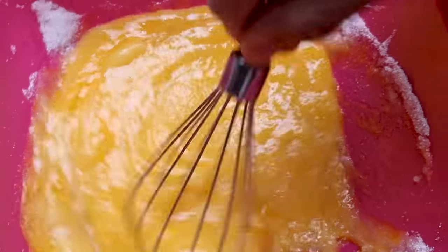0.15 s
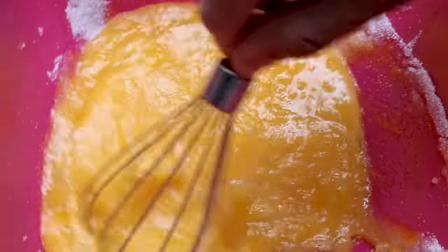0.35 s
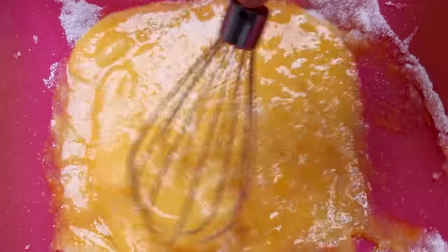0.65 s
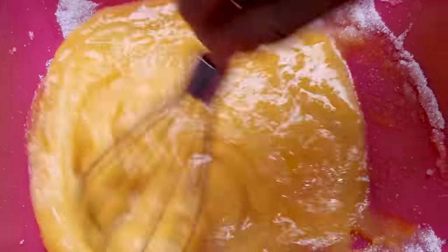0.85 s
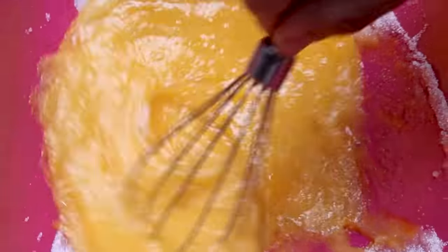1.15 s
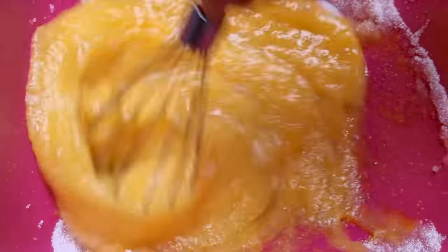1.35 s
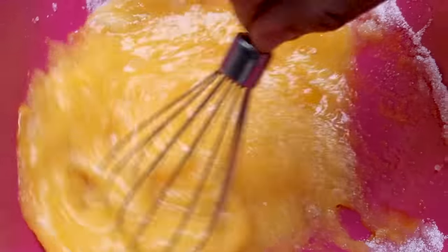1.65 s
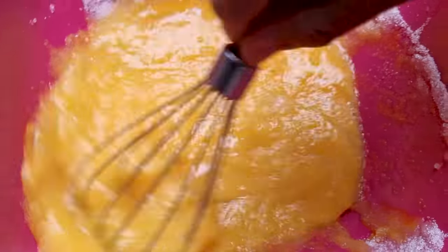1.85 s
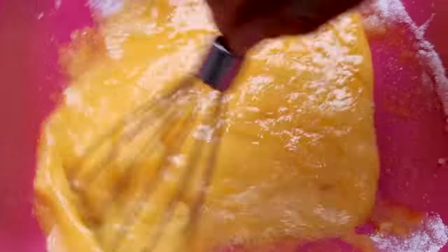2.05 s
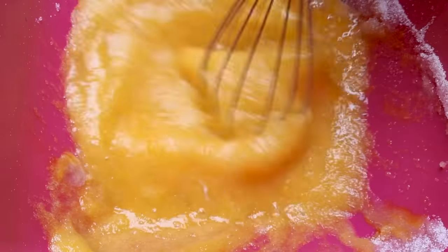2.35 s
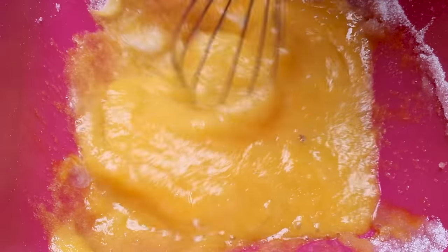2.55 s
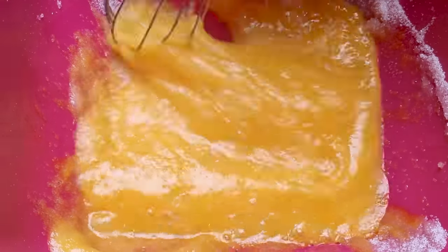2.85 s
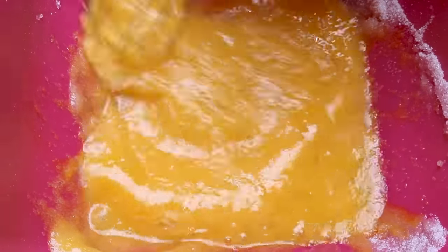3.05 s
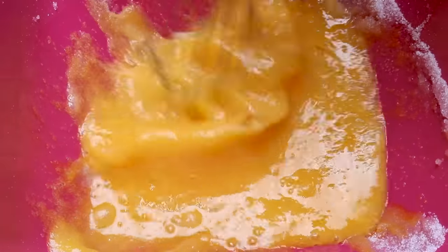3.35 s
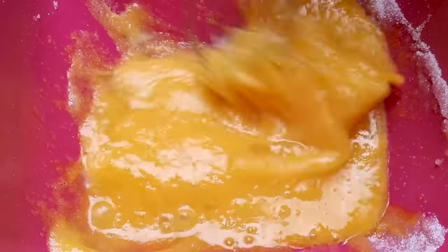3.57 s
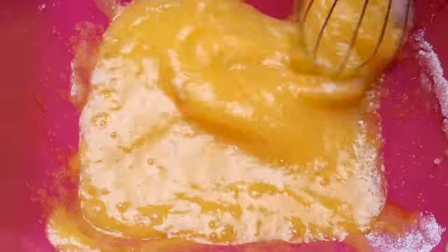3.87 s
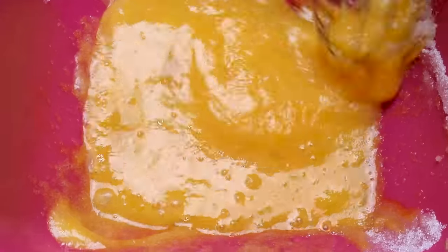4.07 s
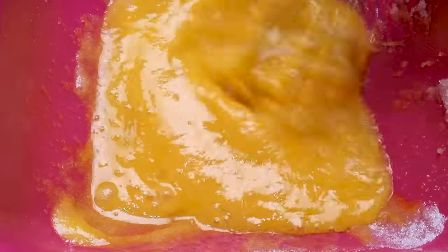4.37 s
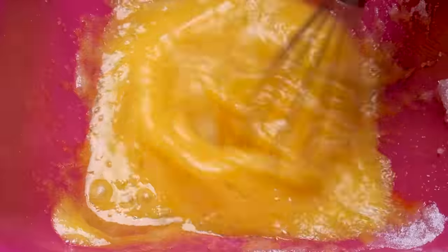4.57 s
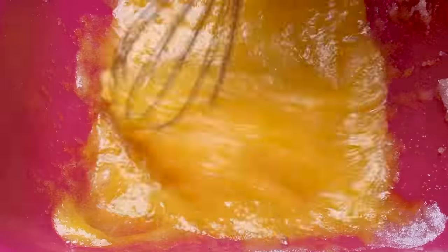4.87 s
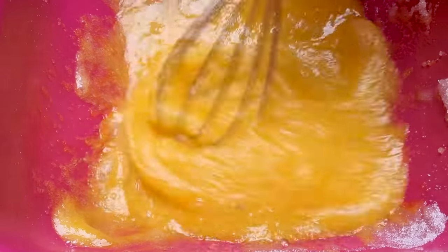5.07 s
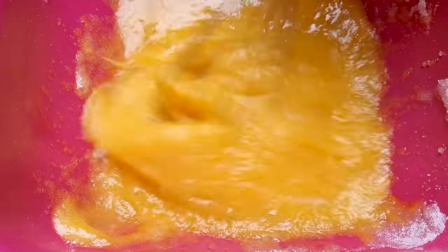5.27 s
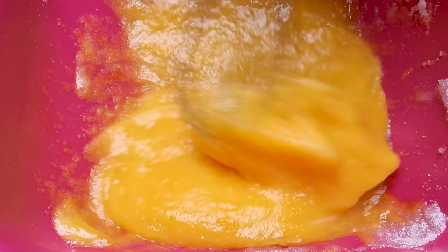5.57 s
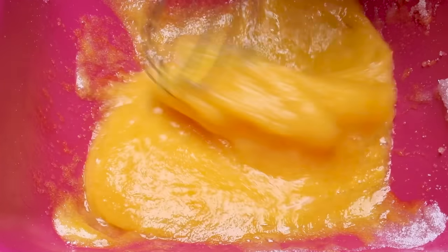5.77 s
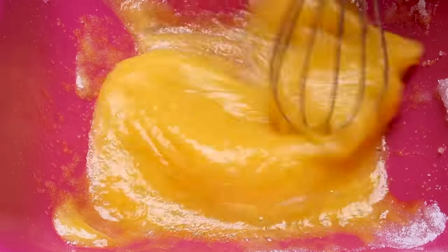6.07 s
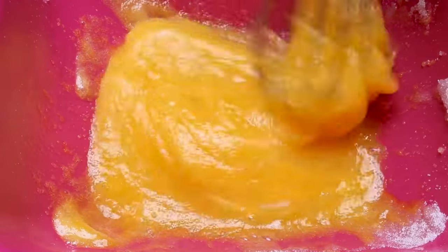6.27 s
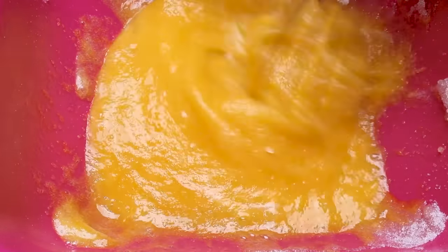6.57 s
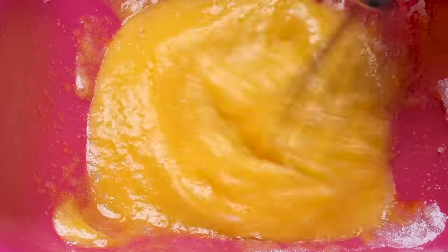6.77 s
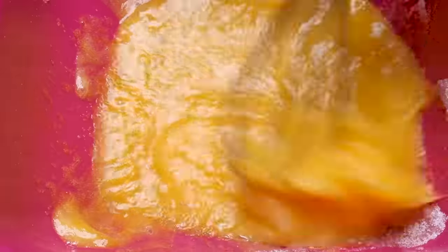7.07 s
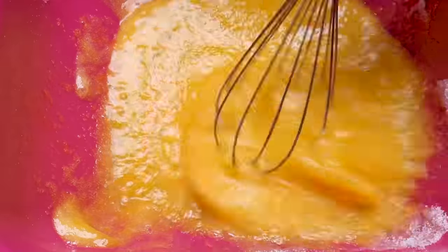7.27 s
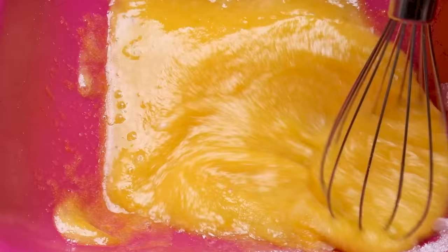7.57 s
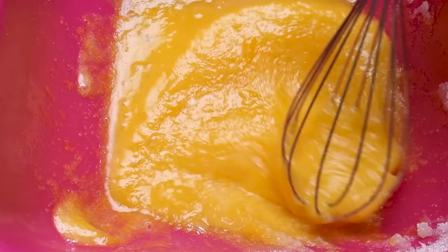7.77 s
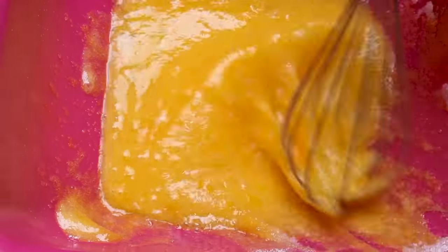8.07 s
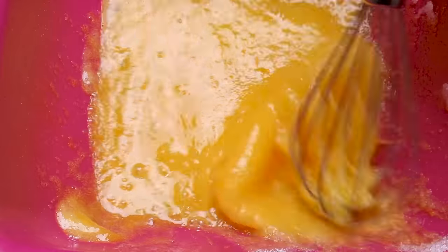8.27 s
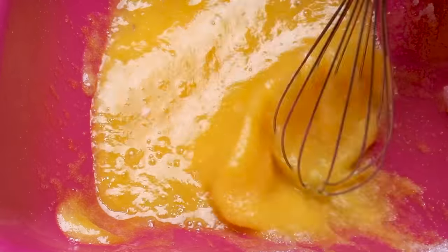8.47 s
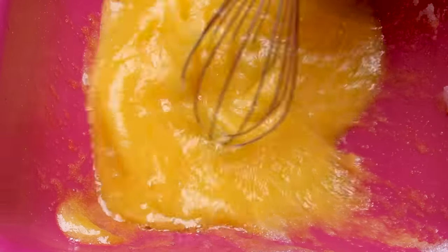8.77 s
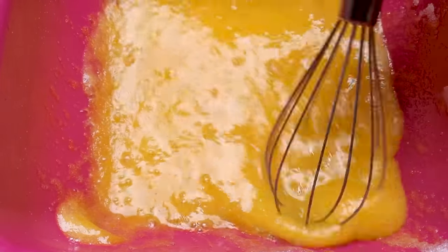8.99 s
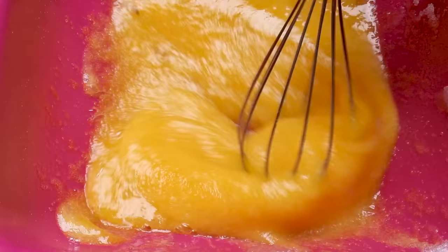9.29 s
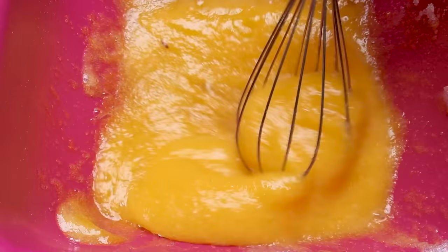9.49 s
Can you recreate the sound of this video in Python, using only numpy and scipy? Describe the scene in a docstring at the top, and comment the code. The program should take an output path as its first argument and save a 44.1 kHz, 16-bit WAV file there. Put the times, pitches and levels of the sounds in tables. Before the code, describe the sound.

A wire whisk rapidly beats thick batter in a plastic bowl, with hollow knocks, short scrapes, wire clicks and faint wet crackling.

```python
"""Whisking batter in a plastic bowl

A wire whisk beats thick egg batter close to two microphones in a kitchen. Each impact excites the
damped modes of the bowl and rattles the wires; stick-slip friction along the wall hisses and drives
the same modes. Bubbles burst in the sugary batter, and the room reverberates briefly over the hum
of an appliance."""
import sys
import numpy as np
from scipy import signal
from scipy.fft import rfft, irfft, next_fast_len
from scipy.io import wavfile
from scipy.ndimage import uniform_filter1d

SR = 44100
rng = np.random.default_rng(int(sys.argv[2]) if len(sys.argv) > 2 else 0)


def log_audio(samples):
    """Write samples as a 16-bit WAV file to the path given in sys.argv[1]."""
    # one column per channel
    frames = np.atleast_2d(samples).T
    # limit to full scale, then quantise
    limited = np.clip(frames, -1, 1)
    pcm = np.round(limited * 32767).astype(np.int16)
    wavfile.write(sys.argv[1], SR, pcm)


N = 424683

# room and microphone noise: (frequency [Hz], relative density [dB])
NOISE_SPECTRUM = [(12, -31.5), (20, -6.5), (110, -2.5), (150, -19), (222, 1), (337, -6), (399, -8.5),
                  (527, -10), (1570, -26), (4060, -51.5), (4940, -42), (9140, -49.5), (16000, -40)]
# likeness of that noise at the two microphones: (frequency [Hz], correlation [0-1])
NOISE_CORRELATION = [(60, 0.96), (300, 0.96), (1000, 0.74), (3000, .1)]
# appliance hum: (frequency [Hz], level [dB], rms frequency deviation [Hz])
HUM_LINES = [(95, -58, 2.1), (142, -58.5, 11.66), (206.4, -66.5, 15)]
# reverberation time: (frequency [Hz], t60 [s])
ROOM_DECAY = [(200, 0.65), (600, 0.28), (1500, 0.2), (4000, 0.26), (10000, 0.19)]
# bubbling of the batter: (time [s], fizz level [dB], wet crackle level [dB])
BUBBLE_LEVELS = [(0.0, -71, -67), (0.32, -53.5, -67), (0.56, -49, -77), (0.8, -48.5, -63), (1.1, -60, -70),
                 (1.3, -51, -62), (1.9, -72, -55), (2.15, -53, -77), (2.841, -61.5, -62), (4.0, -54.5, -59),
                 (4.24, -51.5, -61), (4.75, -57.5, -59), (6.699, -52.5, -58.5), (7.11, -63, -64.5),
                 (7.4, -52, -52), (7.6, -55.5, -58.5), (8.34, -67, -70), (8.64, -53.5, -74),
                 (8.95, -58, -92), (9.1, -69, -64), (9.63, -56, -57.5)]
# fizz, wet crackle and friction hiss: (frequency [Hz], filter gain [dB])
FIZZ_SPECTRUM = [(2470, -68), (4200, -32), (5110, -7), (5530, -14.5), (6830, -12), (14800, -10.5),
                 (16000, -4.5)]
WET_SPECTRUM = [(900, -3.5), (1500, -9.5), (4000, -13.5), (7000, -11.5), (16000, -31.5)]
HISS_SPECTRUM = [(880, -10.5), (1500, 5), (1790, -14.5), (3310, -12.5), (3690, -8), (4080, -9),
                 (7610, -8.5), (9190, -10.5), (15100, -11.5), (16000, -6.5)]
# wires striking each other: (time [s], relative level [dB], frequency [Hz])
WIRE_CLICKS = [(0.246, -32, 4140), (1.048, -17.5, 8180), (1.534, -27, 4100), (1.732, -29, 5060),
               (1.901, -26, 4730), (1.951, -17, 3380), (1.975, -20.5, 3370), (2.325, -29.5, 11600),
               (2.366, -27.5, 8500), (2.798, -20.5, 7730), (3.5206, -21.5, 7940), (4.0499, -12, 7930),
               (4.438, -25.5, 7650), (5.13, -38, 7700), (5.33, -32.5, 4350), (5.506, -28.5, 3620),
               (5.5212, -10.5, 4170), (5.829, -35, 4900), (6.439, -30, 1870), (5.896, -23, 4270),
               (6.586, -28.5, 4970), (6.8, -36, 5460), (7.011, -38, 9990), (7.35, -21.5, 6600),
               (8.281, -26, 5640), (8.47, -18, 3900), (9.07, -18, 12500), (9.323, -35, 5630)]
# wires sliding on the wall: (time [s], relative hiss [dB], relative ring [dB], contact duration [s])
DRAGS = [(0.0, -37.5, -37, 0.045), (0.035, -51, -22.5, 0.08), (0.19, -52.5, -47, 0.099),
         (0.243, -36.5, -30, 0.047), (0.359, -69, -60, 0.21), (0.528, -76, -61, 0.13),
         (0.701, -44, -42, 0.041), (0.759, -34, -28.5, 0.091), (0.955, -43.5, -42.5, 0.09),
         (1.023, -45, -31.5, 0.088), (1.213, -29, -22.5, 0.039), (1.275, -34.5, -31, 0.053),
         (1.37, -59, -42.5, 0.038), (1.481, -52.5, -59, 0.057), (1.532, -33.5, -27.5, 0.043),
         (1.674, -27.5, -24.5, 0.23), (1.818, -75, -35, 0.012), (1.885, -25.5, -24, 0.3),
         (2.168, -54.5, -65, 0.021), (2.218, -39.5, -30.5, 0.042), (2.319, -58, -54, 0.083),
         (2.393, -34, -25, 0.043), (2.558, -23, -19, 0.095), (2.747, -34, -27, 0.017),
         (2.756, -29, -20, 0.09), (2.93, -26.5, -16, 0.11), (3.116, -26.5, -18.5, 0.12),
         (3.301, -37.5, -35.5, 0.092), (3.508, -24.5, -17.5, 0.097), (3.688, -27.5, -20.5, 0.1),
         (3.855, -27.5, -27, 0.13), (4.032, -25, -17.5, 0.033), (4.08, -23.5, -24, 0.071),
         (4.214, -52, -58, 0.03), (4.256, -41, -38, 0.026), (4.368, -46, -63, 0.018),
         (4.427, -38.5, -33, 0.073), (4.614, -43.5, -43, 0.037), (4.799, -39.5, -32, 0.035),
         (4.928, -49.5, -70, 0.0063), (4.992, -45.5, -54, 0.018), (5.123, -36, -49.5, 0.071),
         (5.324, -40.5, -45.5, 0.07), (5.517, -33.5, -26.5, 0.063), (5.676, -43, -48, 0.086),
         (5.817, -53, -52, 0.1), (5.897, -41, -32, 0.062), (6.042, -32.5, -34.5, 0.077),
         (6.235, -38, -35, 0.012), (6.25, -37.5, -28.5, 0.046), (6.385, -46, -37, 0.012),
         (6.43, -40.5, -35, 0.033), (6.623, -48, -45, 0.087), (6.823, -46, -39, 0.052),
         (6.886, -50.5, -43, 0.027), (6.98, -56, -56, 0.14), (7.07, -36, -30, 0.01),
         (7.232, -25.5, -22, 0.05), (7.344, -49, -52, 0.12), (7.426, -43, -40.5, 0.078),
         (7.793, -27, -23, 0.12), (8.022, -28, -26.5, 0.1), (8.206, -27.5, -19, 0.015),
         (8.245, -28, -26.5, 0.098), (8.448, -30.5, -23.5, 0.06), (8.876, -36.5, -26.5, 0.041),
         (9.063, -43.5, -42, 0.11), (9.23, -49.5, -56, 0.0074), (9.321, -51.5, -43, 0.064),
         (9.509, -48, -45.5, 0.029)]
# modes of the wall, the stiff rim and the base rocking on the counter:
# (frequency [Hz], relative level [dB], unscaled t60 [s])
WALL_MODES = [(481, -9, 0.18), (593, -18.5, 0.1), (665.4, -1, 0.059), (728.4, 4, 0.034), (834, -1, 0.043),
              (920.6, 3, 0.03), (1079, 4.5, 0.033), (1161, 2.5, 0.038), (1280, -5, 0.015),
              (1520, -3, 0.039), (1614, 0, 0.031)]
RIM_MODES = [(1929, 7.5, 0.021), (2226, -4.5, 0.03), (2582, -3, 0.024), (2888, -2.5, 0.031),
             (3120, 0, .015)]
BASE_MODES = [(180.7, -8, 0.12), (265.8, 5, 0.12), (394, 5, 0.1)]
# wires striking the bowl:
# (time [s], relative level [dB], ring centre [Hz], thud [dB re blow], sharpness [dB re blow])
IMPACTS = [(0.035, -3.5, 604, -9.5, -10.5), (0.093, -20, 712, -8.5, -30), (0.189, -12.5, 637, -10, -31),
           (0.273, -22.5, 662, -13.5, -18.5), (0.309, -33, 678, -20, -19.5), (0.363, -25, 654, -6.5, -29.5),
           (0.41, -36, 624, -1.5, -32), (0.532, -20, 763, -8.5, -35.5), (0.617, -30, 649, -8.5, -37.5),
           (0.706, -28.5, 495, -5.5, -1.5), (0.763, -23.5, 680, -32, -5), (0.785, -24, 599, -21.5, -22.5),
           (0.849, -15, 870, -8, -27), (0.959, -23, 743, -13, -6), (1.027, -23, 673, -16.5, -2),
           (1.114, -19, 800, -5.5, -33.5), (1.213, -33, 1070, -39.5, -14), (1.278, -29, 885, -34.5, -5.5),
           (1.375, -16, 604, -6.5, -28.5), (1.542, -28, 652, -26, -29.5), (1.611, -18.5, 710, -5.5, -33.5),
           (1.678, -18.5, 704, -6, -14.5), (1.721, -21.5, 638, -11.5, -30.5), (1.819, -13.5, 776, -8, -31),
           (1.883, -26, 664, -22.5, -8), (1.925, -25, 704, -34.5, -1.5), (2.013, -26, 1500, -9, -1),
           (2.039, -15, 848, -11, -24.5), (2.116, -38, 632, -8.5, -33), (2.223, -14, 767, -26.5, -14.5),
           (2.402, -20.5, 1157, -37, -10), (2.559, -9, 674, -35.5, -4.5), (2.757, -3.5, 1160, -14.5, -9.5),
           (2.932, -7, 1088, -6.5, -8.5), (2.943, -4, 1080, -18, -15.5), (3.114, -25.5, 676, -28, -1.5),
           (3.123, -13.5, 1263, -12.5, -6.5), (3.128, -4, 850, -10, -17), (3.184, -16.5, 800, -13.5, -6.5),
           (3.301, -28.5, 667, -12.5, -7), (3.318, -6.5, 873, -13, -22.5), (3.357, -24.5, 950, -7.5, -1.5),
           (3.508, -3.5, 1133, -26.5, -8), (3.553, -28, 654, -24.5, -8), (3.575, -16.5, 865, -20.5, -8),
           (3.691, -8.5, 670, -22, -1), (3.74, -13, 1185, -21, -15), (3.763, -21.5, 694, -27, -3.5),
           (3.857, -3.5, 728, -29.5, -7.5), (3.906, -18.5, 660, -20, -0.5), (4.034, -7, 700, -22, -5),
           (4.08, -19, 650, -20.5, 0), (4.219, -23, 740, -23, -8), (4.258, -24.5, 762, -25, -1.5),
           (4.285, -33.5, 708, -13, -4.5), (4.431, -16, 678, -25, -11), (4.616, -20, 660, -20, -20.5),
           (4.651, -29, 648, -25.5, -15.5), (4.802, -35, 630, -24, -18.5), (4.827, -34, 730, -8, -6),
           (4.996, -23, 750, -32.5, -16.5), (5.132, -36, 1184, -23, -2), (5.153, -28, 759, -27.5, -0.5),
           (5.171, -20, 760, -29, -14.5), (5.207, -28, 690, -18, -5.5), (5.36, -23.5, 830, -16, -7.5),
           (5.394, -28, 692, -32, -30), (5.52, -15.5, 655, -20, -7.5), (5.573, -22.5, 686, -11.5, -21),
           (5.682, -25.5, 642, -13, -3), (5.714, -18, 940, -24, -9.5), (5.749, -21.5, 676, -21, -13),
           (5.91, -19.5, 759, -16, -2), (6.044, -42, 678, -19.5, -7.5), (6.058, -28, 650, -30, -13),
           (6.074, -6.5, 1267, -28.5, -13), (6.161, -33, 623, -21.5, -7.5), (6.237, -25.5, 622, -27.5, -1),
           (6.254, -16, 991, -20, -19), (6.393, -27.5, 670, -21, 0), (6.434, -22.5, 766, -25, -6.5),
           (6.628, -12, 700, -32, -21.5), (6.658, -27, 656, -16, -5), (6.826, -21, 615, -17, -12),
           (6.897, -29, 676, -17.5, -2), (7.074, -26.5, 700, -8.5, -7), (7.143, -36, 940, -8.5, -8.5),
           (7.232, -29, 676, -21, 0), (7.397, -31.5, 689, -15, -5), (7.437, -28.5, 636, -15, 0),
           (7.797, -15.5, 713, -42.5, 0), (7.839, -21, 607, -25.5, -24.5), (7.859, -17.5, 678, -8, -21.5),
           (7.884, -9.5, 815, -11, -21), (8.025, -13.5, 693, -13.5, 0), (8.101, -29, 705, -12.5, 2),
           (8.209, -13, 1168, -29, -6), (8.25, -17.5, 761, -17, -1.5), (8.451, -19.5, 641, -15, -1),
           (8.74, -40.5, 730, -9, -29.5), (8.883, -21, 800, -23.5, -16), (9.068, -32.5, 690, -3, 2),
           (8.89, -25.5, 629, -33.5, -7), (9.106, -20.5, 765, -15.5, -10.5), (9.147, -31.5, 596, -14, -9),
           (9.164, -27, 705, -12.5, -4), (9.34, -26.5, 713, -24.5, -38.5), (9.514, -28, 749, -26.5, -23)]
# directivity of the microphones: (frequency [Hz], left minus right [dB])
MIC_BALANCE = [(5000, -0.5), (9000, -1), (16000, -3.5)]


def gain_of(db):
    """Amplitude ratio of a level in decibels."""
    return 10 ** (np.asarray(db) / 20)


def unit_rms(x):
    """Normalisation to unit mean power."""
    return x / np.sqrt(np.mean(x ** 2) + 1e-20)


def spectrum_at(points, hz):
    """Interpolation on a logarithmic frequency axis."""
    f, value = np.transpose(points)
    return np.interp(np.log(hz + 1), np.log(f + 1), value)


def add(mix, s, sound):
    """Superposition of a two-channel sound, starting at s seconds."""
    part = mix[:, round(s * SR):][:, :sound.shape[1]]
    part += sound[:, :part.shape[1]]


def coloured(x, points):
    """Zero-phase filtering by a gain curve in dB."""
    size = next_fast_len(N)
    response = gain_of(spectrum_at(points, np.fft.rfftfreq(size, 1 / SR)))
    return irfft(rfft(x, size) * response, size)[..., :N]


def grains(per_s, uneven_db):
    """Shot noise: independent impulses of random sign and uneven size."""
    size = gain_of(uneven_db * np.minimum(rng.exponential(1, (2, N)), 5))
    return unit_rms(size * rng.choice([-1., 1.], (2, N)) * (rng.random((2, N)) < per_s / SR))


def waver(samples):
    """Slow random fluctuation: a moving average of white noise, at unit rms."""
    return unit_rms(uniform_filter1d(rng.standard_normal(N), samples))


def coupling_db(hz, centre_hz, db_per_octave):
    """Modal coupling: the place of contact favours the modes near one frequency."""
    return -db_per_octave * abs(np.log2(hz / centre_hz))


def ring(modes, phase_spread, t60_scale, boost_db=0, scatter_db=6.5, rise_s=0.001, detune=0.056):
    """Modal impulse response: damped sinusoids, about phase_spread cycles apart between channels."""
    hz, db, t60 = np.transpose(modes)[:, :, None]
    t = np.arange(3500) / SR
    size, mistuning, shift = rng.standard_normal((len(modes), 3)).T[:, :, None]
    decay_db = 60 * t / (t60 * max(t60_scale, .1))
    envelope = gain_of(db + boost_db + scatter_db * size - decay_db) * (1 - np.exp(-t / rise_s))
    cycles = hz * (1 + detune * mistuning) * t
    pair = np.array([(envelope * np.sin(2 * np.pi * (cycles + side * phase_spread * shift))).sum(0)
                     for side in (-.5, .5)])
    return pair / abs(pair.mean(0)).max()


def background():
    """Steady noise, coherent between microphones at long wavelengths, and frequency-modulated hum."""
    hz, t = np.fft.rfftfreq(N, 1 / SR), np.arange(N) / SR
    common, separate = rfft(rng.standard_normal((2, N)))
    correlation = np.clip(spectrum_at(NOISE_CORRELATION, hz), 0, 1)
    pair = np.array([common, correlation * common + np.sqrt(1 - correlation ** 2) * separate])
    out = gain_of(-56.5) * unit_rms(irfft(pair * gain_of(spectrum_at(NOISE_SPECTRUM, hz)), N))
    for line_hz, db, deviation_hz in HUM_LINES:
        drift = np.cumsum(waver(samples=2000)) * deviation_hz / SR
        out += np.sqrt(2) * gain_of(db) * np.sin(2 * np.pi * (line_hz * t + drift))
    return out * gain_of([[1.6], [-1.6]])


def reverberation(x):
    """Sparse reflections of random sign decay exponentially, each band at its own rate."""
    echoes = np.zeros((2, 20000))
    delays = np.arange(200, 19980, 20) + rng.integers(0, 20, (989, 2)).T
    np.put_along_axis(echoes, delays, rng.choice([-1., 1.], delays.shape), 1)
    hz, t, bands = signal.stft(echoes, SR, nperseg=256)
    decay = gain_of(-60 * t / spectrum_at(ROOM_DECAY, hz)[:, None])
    tail = signal.istft(bands * decay, SR, nperseg=256)[1]
    return signal.fftconvolve(x, tail / np.linalg.norm(tail[0]), axes=1)[:, :N]


def crackle(per_s):
    """Adhesive release: batter lets go of the wires in heavily damped snaps, per_s at each pitch."""
    out, t = np.zeros((2, N)), np.arange(300) / SR
    for hz in np.geomspace(2200, 13000, num=16):
        snap = np.sin(2 * np.pi * hz * t) * np.exp(-hz * t / 1.8)
        out += signal.oaconvolve(grains(per_s, 2.3), snap[None] / np.linalg.norm(snap), axes=1)[:, :N]
    return out


def bubbles():
    """Tiny bursting bubbles merge into shot noise; larger ones snap as the batter folds."""
    s, fizz_db, wet_db = np.transpose(BUBBLE_LEVELS)
    t = np.arange(N) / SR
    fizz = unit_rms(coloured(grains(19000, 1.8), FIZZ_SPECTRUM)) * gain_of(.8 * waver(samples=400))
    wet = unit_rms(coloured(grains(6000, 2.5) + .16 * crackle(14), WET_SPECTRUM))
    wet *= gain_of(3 * waver(samples=1500))
    return fizz * gain_of(np.interp(t, s, fizz_db)) + wet * gain_of(np.interp(t, s, wet_db))


def wire_clicks():
    """Wires striking each other or the bowl give a broadband snap and a rattle near their resonance."""
    out, t = np.zeros((2, N)), np.arange(900) / SR
    envelope = gain_of(-60 * t / .005) + 0.77 * gain_of(-60 * t / 0.05)  # snap, then rattle
    low_hz, high_hz = 3560, 8200
    wires_hz = low_hz * (high_hz / low_hz) ** rng.random(len(IMPACTS))
    on_bowl = [(s, db + sharp_db, hz) for (s, db, _, _, sharp_db), hz in zip(IMPACTS, wires_hz)]
    for s, db, hz in WIRE_CLICKS + on_bowl:
        white, modulator = rng.standard_normal((2, 2, len(t)))
        broadband = 0.064 * np.diff(white, prepend=0) + 0.44 * white
        resonance = unit_rms(uniform_filter1d(modulator, 24)) * np.sin(2 * np.pi * hz * t)
        add(out, s, gain_of(db - 5.0) * envelope * (broadband + 0.88 * resonance))
    return out


def contact_envelopes(lift_db_per_s=900, soft_db=-48):
    """Contact force shapes hiss and ring: a sudden landing, easing pressure, a quick fade on lifting."""
    out, t = np.zeros((2, N)), np.arange(12000) / SR
    landing = np.minimum(t / np.array([[.002], [.008]]), 1)
    for s, hiss_db, ring_db, held_s in DRAGS:
        ease_db_per_s = 7.37 * max(ring_db - soft_db, 0)  # harder landings ease off faster
        shape_db = -ease_db_per_s * np.minimum(t, held_s) - lift_db_per_s * np.maximum(t - held_s, 0)
        add(out, s, gain_of(shape_db + np.array([[hiss_db], [ring_db]])) * landing)
    return out


def friction():
    """Stick-slip friction hisses through the batter and drives the modes that the last blow excited."""
    hiss_gain, ring_gain = contact_envelopes() * gain_of(1.8 * waver(samples=220))
    hiss = unit_rms(coloured(grains(14000, 2.75) + 0.26 * crackle(45), HISS_SPECTRUM))
    hiss *= gain_of(2.0 * waver(samples=60)) * gain_of([[-.4], [.4]])
    s, _, centre_hz, thud_db, sharp_db = np.transpose(IMPACTS)
    last_blow = np.maximum(np.searchsorted(s, np.arange(N) / SR + 0.011) - 1, 0)
    # scraping rings between the last blow's pitch and the bowl's 680 Hz resonance
    centre_hz = centre_hz ** .6 * 680 ** .4
    slips = grains(900, 2.95)
    slips = 1.9 * slips[0] + 0.21 * slips  # nearly the same force in both channels
    wall_db = [coupling_db(hz, centre_hz, 4.64) + db for hz, db, _ in WALL_MODES]
    total_db = 10 * np.log10(sum(gain_of(db) ** 2 for db in wall_db))
    groups = [([mode], db - total_db, .06, .6) for mode, db in zip(WALL_MODES, wall_db)]
    groups.append((BASE_MODES, 0.72 * thud_db - 5.0, .03, .6))
    groups.append((RIM_MODES, 0.19 * sharp_db - 5.0, .4, .3))  # batter damps the high modes
    vibration = np.zeros((2, N))
    for modes, db, phase_spread, t60_scale in groups:
        response = ring(modes, phase_spread, t60_scale, scatter_db=0, detune=0)
        vibration += signal.oaconvolve(slips * gain_of(db[last_blow]), response, axes=1)[:, :N]
    return hiss_gain * hiss + ring_gain * unit_rms(vibration) * gain_of([[-2.0], [-4.0]])


def impacts(hard_db=-14.5):
    """Impulsive excitation of wall, rim and base; damped or hard blows excite a wider band of modes."""
    out, wall_hz = np.zeros((2, N)), np.transpose(WALL_MODES)[0][:, None]
    for s, db, centre_hz, thud_db, sharp_db in IMPACTS:
        excess_db = max(db - hard_db, 0)
        # blows low in the bowl thud more, ring shorter and lie further left
        t60_scale = (0.17 - 0.0425 * thud_db) / (1 - 0.01 * excess_db)
        pan_db = 3.5 + 0.0177 * thud_db + rng.standard_normal()
        boost_db = coupling_db(wall_hz, centre_hz, 32 * t60_scale / (1 + 0.22 * excess_db))
        wall = ring(WALL_MODES, 0.1, t60_scale, boost_db, scatter_db=2.05)
        rim = gain_of(sharp_db) * ring(RIM_MODES, 0.42, t60_scale, rise_s=0.00022)
        # the heavy base responds late
        base = gain_of(thud_db) * ring(BASE_MODES, 0.045, 0.78 * t60_scale, rise_s=0.002)
        add(out, s, gain_of(db - 2.0 + pan_db * np.array([[.5], [-.5]])) * (wall + rim + base))
    return out


def scene():
    """Superposition: knocks, clicks and scraping high-passed at 110 Hz, echoes, bubbles, background."""
    bowl = impacts() + wire_clicks() + friction()
    bowl = signal.sosfilt(signal.butter(3, 110, "high", fs=SR, output="sos"), bowl)
    return bowl + gain_of(-11.5) * reverberation(bowl) + bubbles() + background()


def record(dry):
    """Directivity gives the right microphone more treble; a shelf and a low-pass limit the bandwidth."""
    shelf_hz, limit_hz = 15850, 16995
    hz, balance_db = np.transpose(MIC_BALANCE)
    pair = np.array([coloured(channel, np.transpose([hz, side * balance_db]))
                     for channel, side in zip(dry, (.5, -.5))])
    below_shelf = signal.firwin(511, shelf_hz, window=("kaiser", 8), fs=SR)[None]
    below_limit = signal.firwin(511, limit_hz, window=("kaiser", 9), fs=SR)[None]
    shelved = 0.038 * pair + 0.9 * signal.oaconvolve(pair, below_shelf, "same")
    return signal.oaconvolve(shelved, below_limit, "same")


dry = scene()
out = record(dry)
log_audio(out)
```